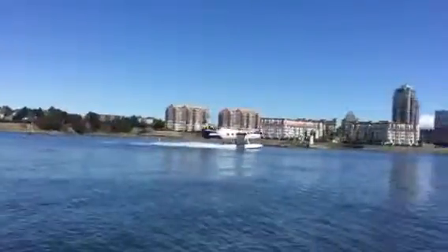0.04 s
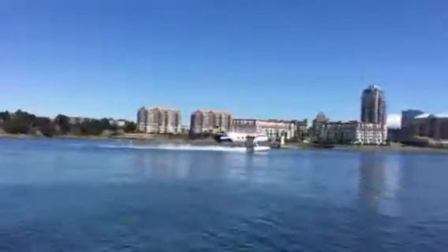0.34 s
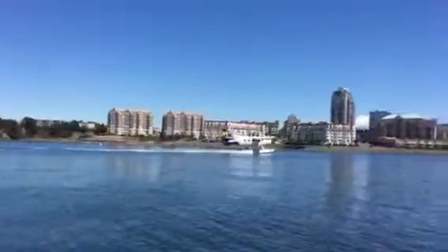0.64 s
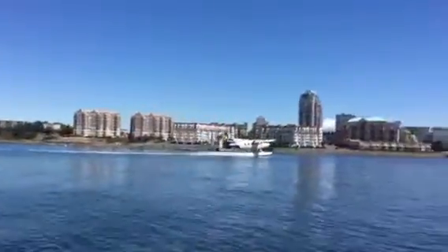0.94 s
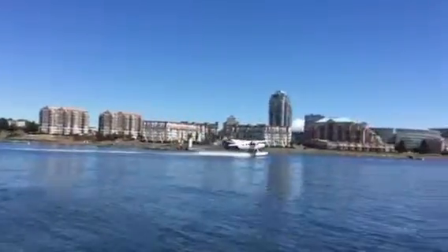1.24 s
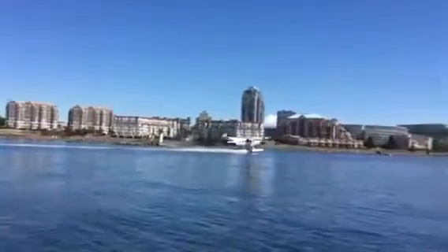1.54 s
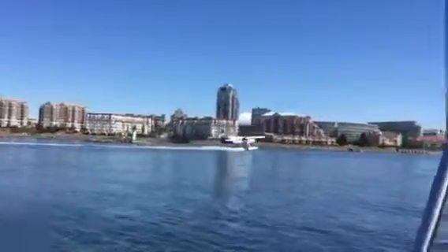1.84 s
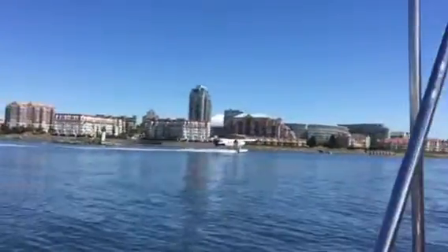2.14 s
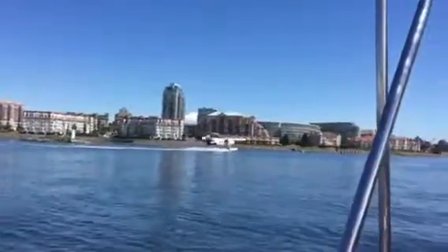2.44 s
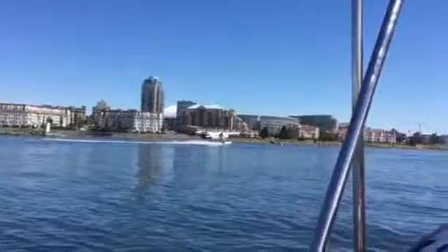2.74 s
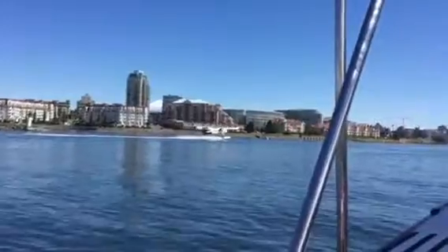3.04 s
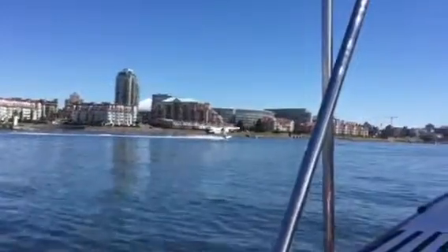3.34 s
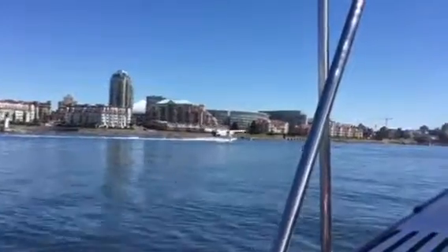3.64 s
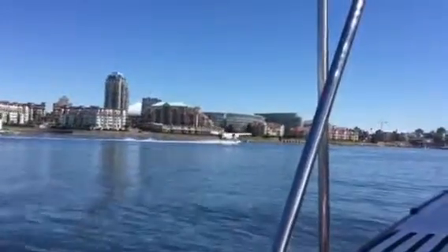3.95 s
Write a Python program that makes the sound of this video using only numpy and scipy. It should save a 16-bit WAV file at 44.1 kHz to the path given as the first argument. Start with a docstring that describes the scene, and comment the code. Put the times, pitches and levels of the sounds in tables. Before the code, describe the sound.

A boat's diesel engines drone and throb while a seaplane roars past further off.

```python
"""A harbour, from the deck of a slow-moving boat, as a seaplane runs across it.
The hull rumbles and throbs with the propeller shaft. Two diesels drone and beat against each other,
with a light clatter; cooling water hisses in time with the generator.
Further off the plane's roar swells and fades, and its turbine whine sinks in pitch as it passes."""
import sys
import numpy as np
from scipy import signal
from scipy.fft import rfft, irfft
from scipy.io import wavfile
from scipy.ndimage import uniform_filter1d

SR = 44100
rng = np.random.default_rng(int(sys.argv[2]) if len(sys.argv) > 2 else 0)


def output_pcm(signal):
    """Save a mono or channel-first signal as 16-bit PCM at the path in sys.argv[1].

    Samples are clipped to [-1, 1] before scaling.
    """
    pcm = np.clip(np.atleast_2d(signal).T, -1, 1) * 32767
    wavfile.write(sys.argv[1], SR, np.round(pcm).astype(np.int16))


N = 176400
T = np.arange(N) / SR

# deck and harbour wash: f/Hz, relative density/dB
WASH_SPECTRUM = [(200, -7.5), (450, 0), (700, 1), (1100, 1.5), (1400, -1.5), (1750, 2), (2000, -2),
                 (2700, -8.5), (4000, -14.5), (6000, -22.5), (9000, -36), (15000, -60)]
# hull and wind rumble: f/Hz, relative density/dB
RUMBLE_SPECTRUM = [(20, -35), (35, -28.5), (50, -15), (62, -11), (78, -2.5), (97, -4), (122, 4), (150, -4),
                   (200, -13.5), (350, -20), (470, -34.5), (900, -58), (4000, -100)]
# machinery hums: f/Hz, level/dB
HUM_LINES = [(123.61, -29.5), (304.7, -49), (331.3, -57.5), (613, -54), (1739, -53)]
# hull vibration: multiple of shaft rate, level/dB
SHAFT_ORDERS = [(15, -30.5), (23, -22), (27, -41)]
# cooling water: f/Hz, relative density/dB
SPRAY_SPECTRUM = [(1200, -12), (2700, -5), (3400, 0), (4300, 0), (4900, -4), (5600, 0), (6900, -8),
                  (8600, -7), (9700, -11), (10400, -19), (11500, -15), (13000, -21), (15600, -26)]
# its gushes: t/s, relative level/dB
SPRAY_ENVELOPE = [(0.03, -58), (0.07, -56.5), (0.76, -55.5), (0.83, -52.5), (0.97, -50.5), (1.05, -46.5),
                  (1.18, -52.5), (1.51, -55), (1.56, -50.5), (1.68, -56.5), (1.77, -53.5), (1.94, -55),
                  (2.07, -51), (2.65, -59.5), (2.75, -56), (3.0, -59), (3.05, -55.5), (3.3, -65.5),
                  (3.55, -58.5), (3.63, -65.5), (3.83, -59.5), (3.96, -61.5)]
# cylinders in firing order: relative thump/dB, relative chug/dB
PORT_CYLINDERS = [(-4.5, -4), (-1, -3.5), (5.5, 2.5), (6, 5.5), (2, 1.5), (-2.5, -4.5)]
STARBOARD_CYLINDERS = [(.5, -8), (0.14, -12), (-0.12, -12), (0.065, -6.5), (-0.57, -9.5), (0.08, -10.5)]
# exhaust pipes: f/Hz, relative gain/dB
PORT_PIPE_RESPONSE = [(25, -40), (38, -37), (52, -17.5), (75, 0.5), (95, 4), (113, 1), (150, -4.5),
                      (188, -11.5), (228, -28), (310, -30), (450, -44), (1500, -100)]
STARBOARD_PIPE_RESPONSE = [(25, -53), (40, -41), (55, -11), (79, 1.5), (119, 1), (159, -21), (200, -20),
                           (240, -41.5), (280, -24.5), (450, -48.5), (1500, -100)]
# gas noise of a firing: f/Hz, relative density/dB
CHUG_SPECTRUM = [(60, -17), (120, -4), (165, 4.5), (205, 1.5), (250, -7.5), (320, -12), (390, -11.5),
                 (480, -29), (900, -30), (3000, -85)]
# diesel clatter: f/Hz, width/Hz, level/dB
CLATTER_MODES = [(847, 54, -54), (999, 48, -47.5), (1666, 120, -45.5), (1734, 35, -49)]
# plane's roar: f/Hz, relative density/dB
ROAR_SPECTRUM = [(20, -29.5), (150, 6.5), (350, -3.5), (500, -4.5), (900, -1), (1400, 1.5), (2000, -12.5),
                 (2800, -12.5), (4000, -10), (4900, -19), (5600, -19.5), (6800, -26), (15000, -70.5)]
# its swell: t/s, level/dB
ROAR_ENVELOPE = [(0, -40.5), (.6, -45), (1, -37), (1.3, -36), (1.6, -37), (2.1, -35), (2.5, -41), (3, -41),
                 (3.5, -47.5), (4, -42)]
# turbine whine: t/s, f/Hz, level/dB
WHINE_TRACK = [(0, 6160, -67), (.07, 6150, -53.5), (.2, 6100, -60), (.39, 5950, -54), (.48, 5890, -66),
               (.75, 5710, -57), (.9, 5630, -65), (1.3, 5450, -60), (1.75, 5290, -62), (2.15, 5170, -58),
               (2.55, 5100, -61), (3.6, 5130, -66), (4, 5050, -73)]

PORT_FIRING_HZ, STARBOARD_FIRING_HZ, GENERATOR_FIRING_HZ = 37.58, 39.745, 61.8
SHAFT_HZ = 5.684


def amp(db):
    """dB to gain."""
    return 10 ** (np.asarray(db) / 20)


def unit(x):
    """Scale to rms 1."""
    return x / np.sqrt(np.mean(x ** 2) + 1e-20)


def curve(rows, column=1):
    """Table column, linearly interpolated in time."""
    rows = np.array(rows)
    return np.interp(T, rows[:, 0], rows[:, column])


def drift(rate_hz):
    """Low-passed random wander, rms 1."""
    f_hz = np.fft.rfftfreq(N, 1 / SR)
    lowpass = np.exp(-(f_hz / rate_hz) ** 2) * (f_hz > 0)
    return unit(irfft(rfft(rng.standard_normal(N)) * lowpass, N))


def colour(x, spectrum):
    """Filter by a spectrum table, rms 1."""
    hz, db = np.transpose(spectrum)
    size = 2 * N
    gain = amp(np.interp(np.log(np.fft.rfftfreq(size, 1 / SR) + 1), np.log(hz), db))
    return unit(irfft(rfft(x, size) * gain, size)[:N])


def noise(spectrum, patch_db):
    """Coloured noise, patchy in time and frequency, rms 1."""
    bins = signal.stft(rng.standard_normal(N), nperseg=512)[2]
    patches = uniform_filter1d(rng.standard_normal(bins.shape), size=7, axis=0)
    patches = unit(uniform_filter1d(patches, size=12, axis=1))
    patchy = signal.istft(bins * amp(patch_db * patches), nperseg=512)[1][:N]
    return colour(patchy, spectrum)


def resonance(hz, width_hz):
    """Noise-driven mode, rms 1."""
    pole = np.exp(-np.pi * width_hz / SR)
    band = rng.standard_normal(N) + 1j * rng.standard_normal(N)
    for r in (pole, pole ** 4):
        band = signal.lfilter([1 - r], [1, -r], band)
    return unit((band * np.exp(2j * np.pi * hz * T)).real)


def cycles(hz, start_s=0, wander_s=0.00028):
    """Cycle count of a machine with slight speed wander."""
    return hz * (T - start_s + wander_s * drift(0.92))


def tone(phase_cycles, level_db, wander_db=1.5):
    """Sine with a wavering level."""
    peak = amp(level_db + wander_db * drift(4.2)) * np.sqrt(2)
    return peak * np.sin(2 * np.pi * (phase_cycles + rng.random()))


def hull(rumble_db=-26.5, swell_db=0.4, wash_db=-38.5):
    """Shaft throb and machinery hum over a lumpy rumble and an even wash."""
    shaft = cycles(SHAFT_HZ, start_s=0.137)
    throb = sum(amp(db) * np.sqrt(2) * np.cos(2 * np.pi * order * shaft) for order, db in SHAFT_ORDERS)
    hums = sum(tone(cycles(hz), db) for hz, db in HUM_LINES)
    rumble = amp(rumble_db + swell_db * drift(8.5)) * noise(RUMBLE_SPECTRUM, patch_db=3.0)
    wash = amp(wash_db) * noise(WASH_SPECTRUM, patch_db=1.52)
    return throb + hums + rumble + wash


def cooling_water(gain_db=7.5, puff_depth=0.5, puff_width_cycles=0.15, drops_per_s=4000):
    """Uneven gushes of mist and drops, puffed out by each generator firing."""
    from_firing = np.sin(np.pi * cycles(GENERATOR_FIRING_HZ)) / np.pi
    puffs = unit(1 + puff_depth * np.exp(-(from_firing / puff_width_cycles) ** 2))
    impacts = (rng.random(N) < drops_per_s / SR) * rng.choice([-1, 1], N)
    size_db = 3.0 * np.minimum(rng.exponential(1, N), 5)
    drops = amp(-6) * colour(impacts * amp(size_db), SPRAY_SPECTRUM)
    mist = noise(SPRAY_SPECTRUM, patch_db=2)
    return amp(curve(SPRAY_ENVELOPE) + gain_db) * puffs * unit(mist + drops)


def exhaust(firings, cylinders, pipe, pipe_db, gas_gain_db=-32, spread_db=0.58):
    """Each firing thumps the pipe and puffs out gas; uneven cylinders make the engine lope."""
    nearest = np.round(firings).astype(int)
    thump_db, chug_db = np.array(cylinders)[nearest % len(cylinders)].T
    jitter_db = spread_db * rng.standard_normal(N)[nearest]
    onsets = np.diff(np.floor(firings), prepend=np.floor(firings[0]))
    thumps = amp(pipe_db) * colour(onsets * amp(thump_db + jitter_db), pipe)
    puffs = np.cos(np.pi * firings) ** 2 * amp(gas_gain_db + chug_db + jitter_db)
    return thumps + puffs * noise(CHUG_SPECTRUM, patch_db=0)


def diesels(surge_db=1.0, surge_hz=3.6, crank_depth=0.29, firing_depth=0.19):
    """Two engines at slightly different idle speeds beat and surge; crank and firings shake the clatter."""
    port = cycles(PORT_FIRING_HZ, start_s=0.0072)
    starboard = cycles(STARBOARD_FIRING_HZ, start_s=0.0083)
    drone = exhaust(port, PORT_CYLINDERS, PORT_PIPE_RESPONSE, pipe_db=-22.5)
    drone += exhaust(starboard, STARBOARD_CYLINDERS, STARBOARD_PIPE_RESPONSE, pipe_db=-21.5)
    clatter = sum(amp(db) * resonance(hz, width_hz) for hz, width_hz, db in CLATTER_MODES)
    crank_turns = 2 * starboard / len(STARBOARD_CYLINDERS)  # four-stroke
    shake = 1 + crank_depth * np.sin(2 * np.pi * crank_turns)
    shake -= firing_depth * np.cos(2 * np.pi * starboard)
    return drone * amp(surge_db * drift(surge_hz)) + clatter * shake


def seaplane(waver_hz=20, flutter_db=2.5):
    """Broad roar fluttering in the wind; wavering turbine whine that falls as the plane passes."""
    roar = amp(curve(ROAR_ENVELOPE)) * noise(ROAR_SPECTRUM, patch_db=0.8)
    whine_hz = curve(WHINE_TRACK) + waver_hz * drift(63)
    whine_db = curve(WHINE_TRACK, column=2) + flutter_db * drift(25)
    return roar + tone(np.cumsum(whine_hz) / SR, whine_db)


def scene():
    """Boat close by, plane across the water; mono."""
    return (diesels() + hull() + cooling_water() + seaplane())[None]


def record(dry):
    """Low-pass at 15.7 kHz."""
    lowpass = signal.firwin(511, 15700, window=("kaiser", 9), fs=SR)
    return signal.oaconvolve(dry, lowpass[None], "same")


dry = scene()
out = record(dry)
output_pcm(out)
```